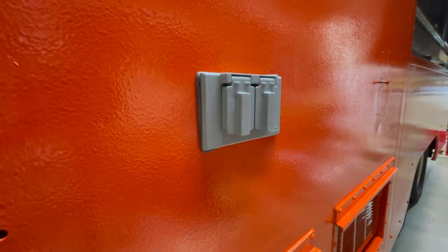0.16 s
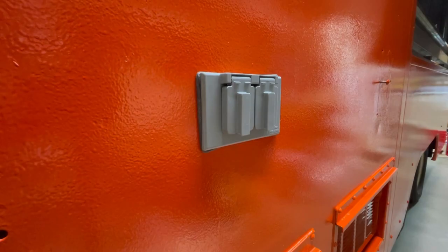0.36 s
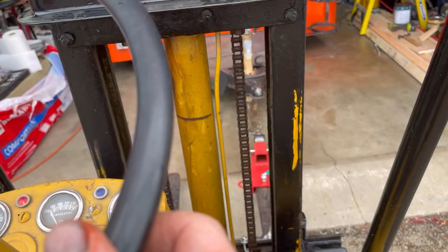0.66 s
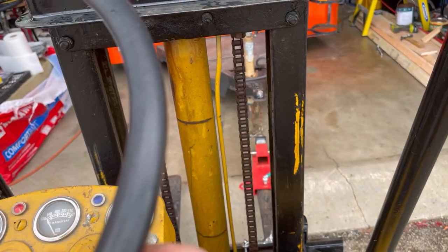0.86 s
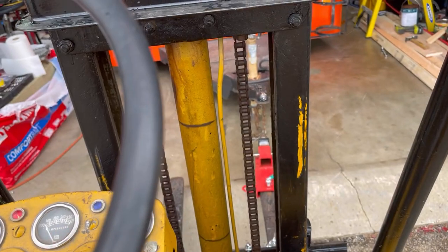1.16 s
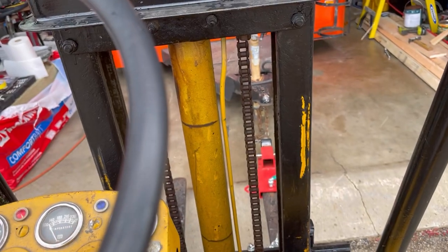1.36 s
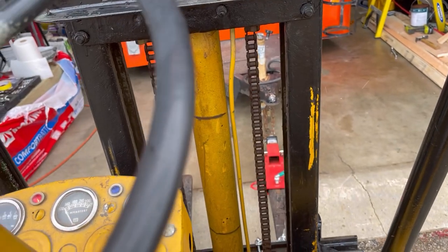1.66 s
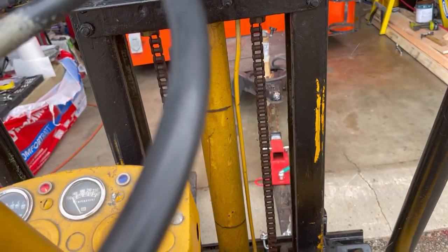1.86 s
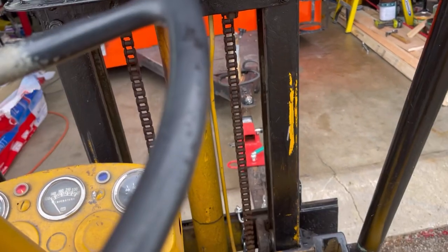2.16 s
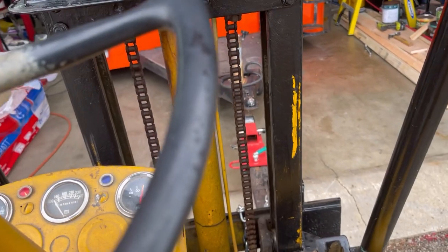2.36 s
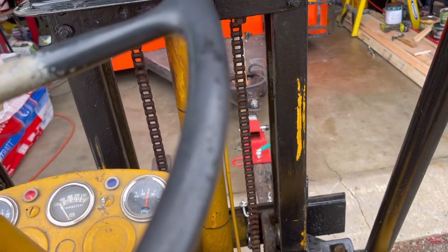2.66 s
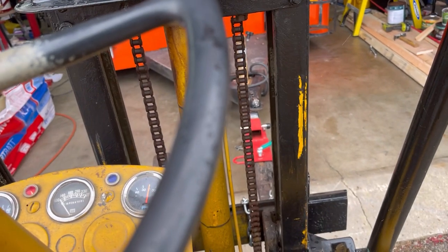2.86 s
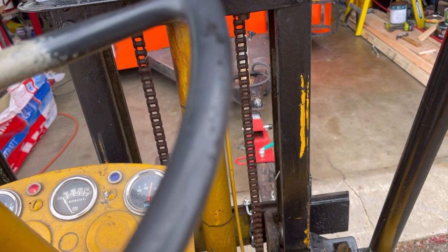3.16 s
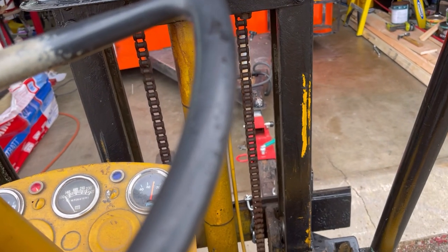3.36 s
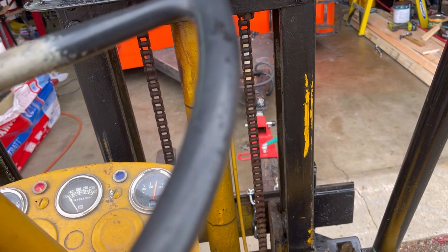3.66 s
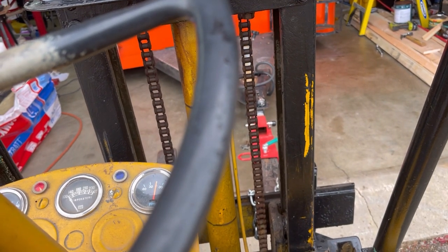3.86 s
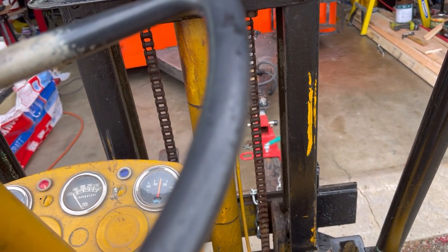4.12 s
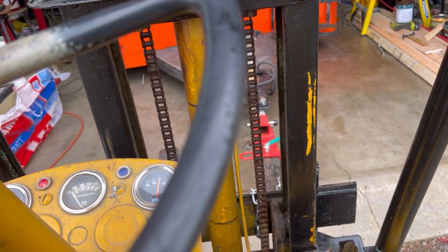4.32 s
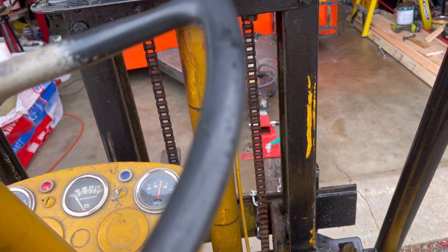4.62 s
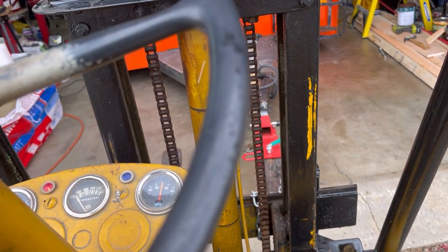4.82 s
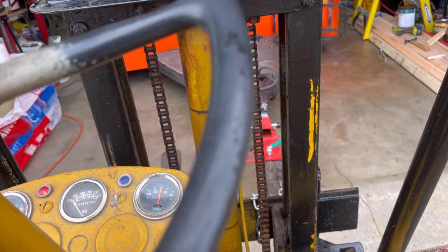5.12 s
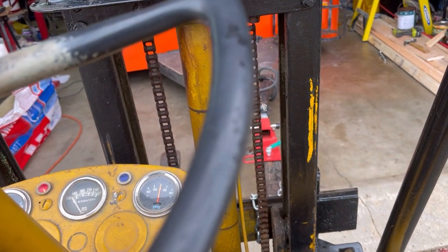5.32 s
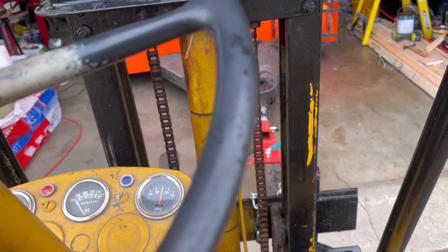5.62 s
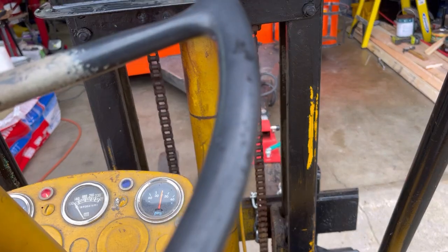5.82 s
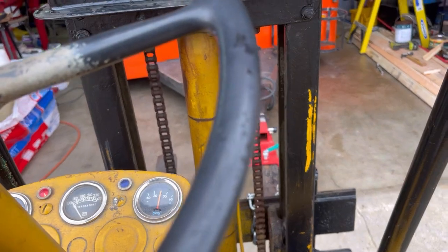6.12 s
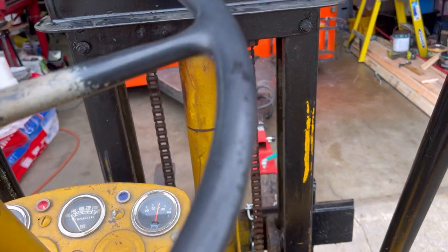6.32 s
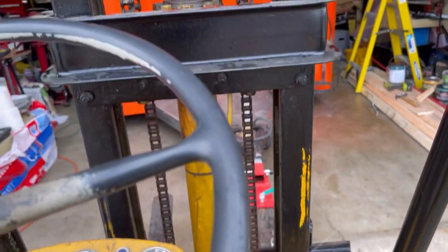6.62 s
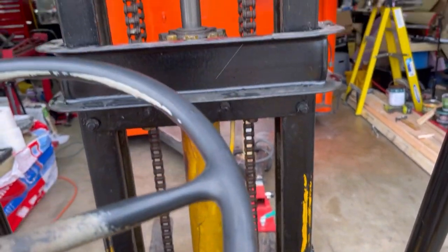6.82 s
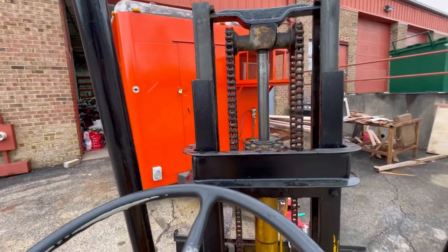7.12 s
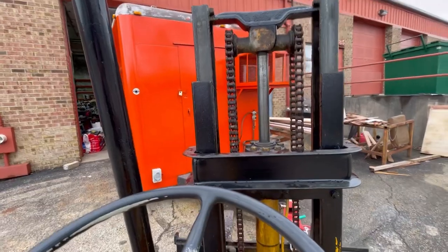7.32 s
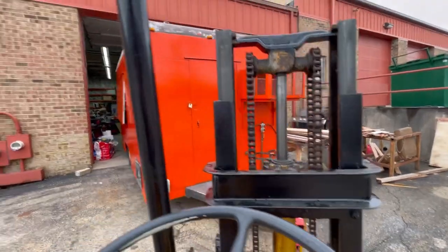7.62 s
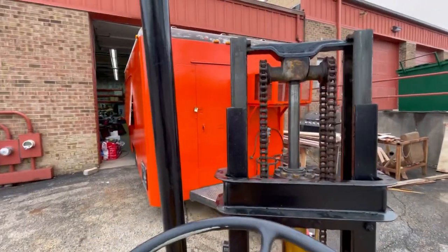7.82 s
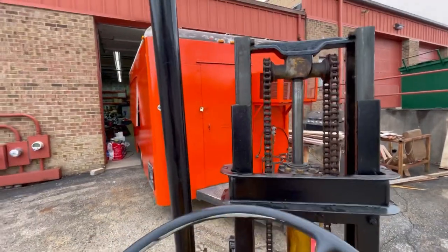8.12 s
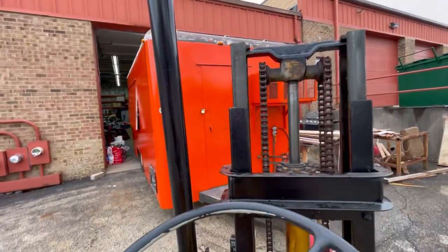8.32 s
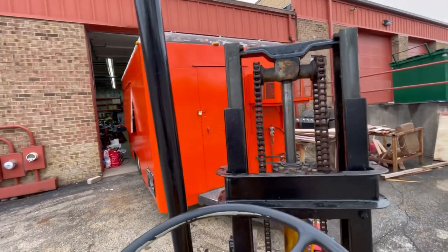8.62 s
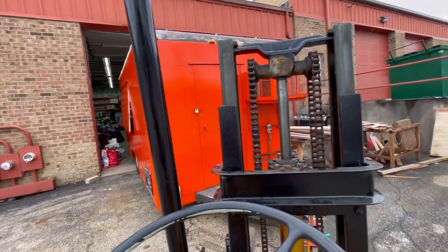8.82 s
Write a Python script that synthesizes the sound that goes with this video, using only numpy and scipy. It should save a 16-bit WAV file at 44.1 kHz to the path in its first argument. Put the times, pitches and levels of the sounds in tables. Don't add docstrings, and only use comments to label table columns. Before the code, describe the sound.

Heard from the driver's seat in stereo: a quiet indoor hush gives way suddenly to a lumpy diesel idle with buzzing panels and bright rattling castings. Low thumps of handling dot the first second. Revs rise midway, followed by a hard double lever clank that briefly dips the sound. The scene jumps outdoors, the engine slows with light chain shivers, then climbs quickly to a louder, faster roar.

```python
import sys
import numpy as np
from scipy import signal
from scipy.fft import rfft, irfft, next_fast_len
from scipy.io import wavfile
from scipy.ndimage import uniform_filter1d, map_coordinates

SR = 44100
rng = np.random.default_rng(int(sys.argv[2]) if len(sys.argv) > 2 else 0)


def volts_from_decibels(level):
    exponent = np.asarray(level, float) / 20
    return 10 ** exponent


def waveform_to_disk(signal):
    frames = np.transpose(np.atleast_2d(signal))
    scaled = np.clip(frames, -1, 1) * 32767
    samples = np.round(scaled).astype(np.int16)
    wavfile.write(sys.argv[1], SR, samples)


N = 396018
TIME = np.arange(N) / SR

# [t/s, crank position/firings]
CUTS = [
    (0.561, 0.0),
    (1.959, 0.672),
    (6.892, 1.468),
]

# [f/Hz, level/dB per Hz]
SHOP_AIR = [(18, -38), (30, -22), (64, -1.5), (107, -13), (190, -12.5), (330, -19), (586, -22), (950, -17),
            (1050, -19.5), (2200, -25), (5620, -33.5), (8800, -39), (9900, -56), (11200, -54), (12500, -50),
            (14200, -51), (15000, -70)]
# [f/Hz, likeness -1 to 1]
SHOP_ALIKE = [(60, 0.98), (230, 0.67), (880, -0.45), (3360, 0.085), (12800, -0.2)]
SHOP_DB = -47.5
# [f/Hz, level/dB]
HUM = [(59.2, -55), (269.2, -68), (845.2, -76), (958.2, -73)]

# [t/s, peak level/dB, f/Hz]
BUMPS = [(.643, -45.5, 216), (0.653, -23.5, 273), (0.699, -18, 156), (0.821, -28, 150), (.891, -19, 205),
         (.909, -31, 150), (1.035, -22, 280), (1.146, -29.5, 240), (1.192, -28, 200), (1.958, -27, 150),
         (6.893, -38, 35)]
# [t/s, peak level/dB]
TICKS = [
    (1.9595, -34),
    (6.8945, -42),
]

# [t/s, peak level/dB, t60/s, brightness 0-1]
CLANKS = [
    (5.7015, -31, .05, 0),
    (5.7055, -24.5, .07, 1),
    (5.8640, -21, .05, .15),
    (5.8765, -23, .1, 0),
    (5.888, -27, .1, 0),
    (5.909, -29, .16, 0),
]
# [f/Hz, t60/s, heavy-blow level/dB, thin-blow level/dB]
LEVER_MODES = [(1160, 0.036, -15, -18), (1770, 0.078, -5.5, -10), (2220, 0.04, 1.5, -12),
               (2430, 0.066, -5.5, -9), (2714, 0.083, -4, -7), (3050, 0.038, -8, -2),
               (3640, 0.044, -12, -2), (4470, 0.054, -17, -11), (5530, 0.046, -19, -7),
               (5900, .04, -25, -9)]
# [f/Hz, level/dB per Hz]
THIN_STEEL = [(300, -40), (900, -1), (2000, -9), (3000, -2), (4000, -8), (5700, -4), (7000, -16),
              (11500, -13), (13300, -45)]
# [f/Hz, level/dB per Hz]
HEAVY_STEEL = [(250, -8.5), (830, -3), (1300, -8), (2300, -4), (2800, -6), (3600, -14.5), (5200, -19),
               (11500, -23), (13300, -45)]

# [t/s, peak level/dB]
JINGLES = [(7.3118, -41), (7.416, -44), (7.6969, -40), (7.7323, -38), (7.9733, -48), (8.0531, -45),
           (8.092, -36), (8.1319, -40), (8.3594, -39)]
# [f/Hz, level/dB per Hz]
CHAIN_LINKS = [(2500, -27), (5500, -2), (7000, -9), (8800, 4), (10400, 4), (12300, -9), (13300, -19),
               (16000, -40)]
JINGLE_T60_S, JINGLE_DB = 0.059, -5

# [f/Hz, likeness -1 to 1]
ALIKE_SHED = [(60, 0.8), (130, 0.98), (280, 0.95), (450, 0.95), (700, 0.18), (1290, 0.46), (4500, 0.42),
              (9000, 0.4), (11500, 0.4)]
# [f/Hz, likeness -1 to 1]
ALIKE_YARD = [(60, 0.2), (130, 0.48), (280, 0.92), (600, 0.2), (1290, 0.11), (2770, -0.16), (6000, .1),
              (9000, .4), (12000, 0.37)]

# [t/s, firing rate/(1/s)]
SPEED = [(0.561, 22.883), (1.803, 21.717), (1.958, 22.469), (1.959, 22.647), (4.5, 22.29), (5.151, 26.903),
         (5.437, 28.344), (5.907, 28.511), (6.607, 30.896), (6.891, 31.241), (6.892, 29.552),
         (7.072, 30.982), (7.596, 26.915), (8.151, 25.645), (8.283, 26.138), (8.438, 29.339),
         (8.794, 40.924), (8.979, 41.99)]
HUNT_HZ, HUNT_S, HUNT_FROM_S, HUNT_TO_S = .325, 1.035, 1.761, 4.55
# [t/s, level over idle/dB]
LOAD = [(.56, -1), (4.3, -1), (4.6, 0.5), (5.2, 0), (5.82, 0), (6.05, -3), (6.89, -3), (6.893, -1),
        (7.2, -4.5), (7.8, -4), (8.2, -2.5), (8.35, -1.5), (8.45, 1.5), (8.6, 3), (8.8, 3), (8.98, 2)]
# [level at idle/dB, growth/(dB per dB of load), change in the yard/dB]
LAYERS = [
    (-33.5, 0.7, -1),
    (-44.5, 1.36, 2.5),
    (-46, 1.55, 0),
    (-1, 0.5, -2.5),
]

STROKE_DB = [-4, -4.5, -4, -3, -9, -9, -20.5, -15, -17.5, -20.5, -17]
# [multiple, level/dB]
HALVES = [(1.5, -34), (2.5, -22), (3.5, -35), (4.5, -29), (8.5, -26.5)]
HALVES_YARD_DB = 6
# [f/Hz, level in the doorway/dB, level in the yard/dB]
PIPE = [(44.3, -37, -50), (55.4, -24.5, -21.5), (71.6, -25.5, -25.5), (87.5, -35, -33.5),
        (103.5, -34.5, -33.5), (156, -42, -48), (197.2, -41, -49), (215.3, -30, -41.5), (226, -41.5, -42),
        (253, -47, -42), (332, -44.5, -42), (520, -50, -43)]
# [f/Hz, lag/cycles]
PIPE_LAG = [(45, -.15), (62, .38), (68, .65), (84, .8), (92, 1.0), (112, 1.3), (135, 1.35), (160, 1.28),
            (182, 1.17), (203, 1.45), (250, 1.6)]
ROAR_FROM, ROAR_DB, ROAR_DULLS = 30.7, 0.89, 0.098

# [f/Hz, t60/s, delay/s, level for cylinders 1-4/dB (4 columns),
# change when coasting in the yard/dB]
PANELS = [(167.4, 0.075, .004, -7.5, -2.5, 0, 0, 2.5), (204.5, 0.1, .006, -2, -3.5, -3, -5.5, 0.4),
          (255, 0.07, .006, 0.5, 0.5, -0.5, 1, -2), (311, 0.045, .004, -12, -10, -5.5, -9.5, -1.5),
          (413.9, 0.12, -.002, 4, -.5, -1.5, -4, -5), (443.4, 0.071, 0, 1, -13, -9, -1.5, -16),
          (504, 0.051, -0.0064, -2, -6.5, -10.5, -14, -9), (573, 0.23, -.003, -10, -21, -42, -41, -12),
          (592, 0.22, -.003, -19, -33, -36, -54, 17), (723, 0.033, -0.0043, -15, -17, -23, -20.5, 14)]
OPEN_DB = [0.1, 1.5, -1.5, 7, -4.5, -4, -2, 3, -6, 4.5]
# [t/s, level/dB]
JOLTS = [(.911, 1.5), (1.09, 0), (1.27, 2), (1.45, 1), (1.814, -0.5), (4.765, -4), (4.94, 0), (6.99, -1),
         (7.12, -1.5), (7.256, -1), (7.38, -7.5), (7.52, -2), (7.68, 3.5), (7.83, -1), (7.98, 3.5),
         (8.13, 2.5), (8.29, -3)]
EVENED, LOWEST_DB, LOW_PANELS_DB, UPPER_PANELS_DB, TOP_PANEL_DB = 0.4, -2, 8, 2, 10
FIRST_UPPER_DB = 3
SPOOL_DB = -5
FLOOR_STIFFENS_HZ = 9
KNOCK_SAGS_DB, KNOCK_SAGS_UNDER = 1.5, 28.2
# [f/Hz, level/dB per Hz]
RUMBLE = [(25, -42), (45, -29), (80, -4.5), (130, -7), (214, -11.5), (334, -15.5), (414, -9.5), (509, -22),
          (800, -26), (1040, -30), (1760, -120)]

# [f in the first, second and third view/Hz (3 columns), width/Hz, level/dB,
# change in the yard/dB]
BLOCK = [(840, 888, 876, 41, -14.5, 7), (1307, 1275, 1310, 59, -9, 3.5), (1648, 1700, 1775, 45, -1, -0.5),
         (1956, 1890, 1900, 50, -9, 0), (2280, 2300, 2350, 110, -9, 3), (2470, 2530, 2530, 29, -5, 3),
         (2800, 2670, 2900, 25, -17, 14), (3350, 3160, 3330, 67, -3, 2), (3610, 3670, 3530, 35, -12.5, 4),
         (3834, 3880, 3880, 34, -2, 7), (4210, 4100, 4290, 66, 3, 1), (4370, 4440, 4800, 77, 5, -2),
         (4560, 4650, 4660, 70, -2, -1), (5260, 5390, 5350, 40, -1, 3.5), (5610, 5760, 6500, 90, -1, 1),
         (6140, 6100, 5600, 100, -11, 15), (8040, 8060, 7890, 68, -3, -8), (8320, 8510, 8380, 98, -3, 4),
         (8600, 8830, 10000, 86, -4, 9), (8980, 9080, 9250, 84, -6, 1),
         (10700, 11300, 11500, 106, -21.5, -6)]
# [f/Hz, level/dB per Hz]
RATTLE = [(350, 0), (600, -2), (1040, -4.5), (1280, -7.5), (1530, -9.5), (1700, -9), (2600, -14),
          (3640, -32), (6160, -120)]
# [f/Hz, level/dB per Hz]
CLATTER = [(1350, -12.5), (2300, -15), (2820, -2.5), (3220, -1), (3500, 0), (4520, -6), (4900, 0.5),
           (5890, -1.5), (6870, -8.5), (8750, -6.5), (10200, -2.5), (11400, -7.5), (12200, -14.5),
           (13000, -27), (14500, -45)]
# [t/s, level/dB]
HARD = [(.911, 1), (1.09, 1.5), (1.45, -0.5), (1.633, -1), (1.814, 1.5), (3.303, 0.5), (4.598, 1.5),
        (4.93, 0.1), (4.969, 0.4), (5.084, 0.5), (7.521, 2), (7.67, -2), (8.091, 2.5), (8.284, 2),
        (8.43, 1.5), (8.498, 2.5)]
VALVE_LEAD_S, DAMPED_AT = .003, .92
STAGGER_S = .0014
YARD_RING_DB, YARD_BED_DB = -3, .5

# [f/Hz, first level/dB, second level/dB, third level/dB]
FACING = [(300, 0.5, 0.5, 0), (780, -0.5, -0.5, -.5), (1090, -3.5, -1, 2), (1480, 1, 0, 1.5),
          (2580, 0.5, -1, 0), (5900, -1.5, -1.5, -1), (9900, -0.5, -0.5, -1.5), (12600, -1.5, -0.5, 2.5)]
TURN_S, TURN_HZ = .0003, 500

# [t/s, level/dB]
DUCK = [
    (5.87, 3.5),
    (5.92, -6),
    (6.0, -2),
    (6.15, 3),
]
# [f/Hz, left minus right level/dB]
LEAN = [(60, 0.0), (110, 0.0), (200, 0.5), (360, 0.5), (650, -1.5), (1180, -1.0), (2150, -0.5),
        (3900, -2.5), (7080, -1.5), (12800, 0.0)]
# [f/Hz, width/Hz, level/dB]
SIDE_DIPS = [(6650, 400, -11), (8650, 400, -18)]
STARVED_DB, STARVED_SWAY_DB = -14.5, 3


def unit(x):
    return x / np.sqrt(np.mean(x ** 2) + 1e-20)


def along(points, hz):
    f, v = np.transpose(points)
    return np.interp(np.log(hz + 1), np.log(f + 1), v)


def curves(rows):
    s, *cols = np.transpose(rows)
    return [np.interp(TIME, s, c) for c in cols]


def wobble(rate):
    return map_coordinates(rng.standard_normal(int(N * rate / SR) + 4), [TIME * rate])


def coloured(x, points):
    m = next_fast_len(N + 8192)
    response = volts_from_decibels(along(points, np.fft.rfftfreq(m, 1 / SR)))
    return unit(irfft(rfft(x, m) * response, m)[..., :N])


def spread(pair, alike):
    likeness = np.clip(along(alike, np.fft.rfftfreq(N, 1 / SR)), -1, 1)
    turn = np.arccos(likeness) / 2
    mid, side = irfft(rfft(pair) * [np.cos(turn), np.sin(turn)], N)
    return np.array([mid + side, mid - side])


def laid(times, rows):
    at = np.round(np.asarray(times) * SR).astype(int)[:, None] + np.arange(rows.shape[-1])
    return np.bincount(at.ravel(), rows.ravel(), N + SR)[:N]


def workshop():
    air = coloured(rng.standard_normal((2, N)), SHOP_AIR)
    hush = volts_from_decibels(SHOP_DB - 3.5 + 0.78 * wobble(9.4)) * spread(air, SHOP_ALIKE)
    hum = sum(volts_from_decibels(db + 3.0 + 1.5 * wobble(4.8)) * np.sin(2 * np.pi * hz * TIME) for hz, db in HUM)
    return (hush + hum) * volts_from_decibels([[1.1], [-1.1]]) * (TIME < CUTS[0][0])


def handling():
    s, db, hz = np.transpose(BUMPS)[:, :, None]
    cycles = hz * np.arange(SR // 10) / SR
    pushes = laid(s[:, 0], volts_from_decibels(db + 5.5) * np.sin(2 * np.pi * cycles) * np.exp(-1.6 * cycles))
    s, db = np.transpose(TICKS)[:, :, None]
    return pushes + laid(s[:, 0], volts_from_decibels(db) * [1, -1])


def chain():
    s, db = np.transpose(JINGLES)[:, :, None]
    t = np.arange(SR // 10) / SR
    decay = volts_from_decibels(db + JINGLE_DB - 60 * t / JINGLE_T60_S)
    shape = laid(s[:, 0] - .002, decay * (1 - np.exp(-t / .002)))
    links = coloured(rng.standard_normal((2, N)), CHAIN_LINKS)
    return shape * volts_from_decibels(3 * wobble(300)) * spread(links, ALIKE_YARD)


def lever():
    s, db, t60, bright = np.transpose(CLANKS)[:, :, None]
    t = np.arange(SR // 4) / SR
    blows = volts_from_decibels(db - 8.5 - 60 * t / t60) * (1 - np.exp(-t / .002))
    share = np.clip(bright, 0, 1)
    thin = laid(s[:, 0], share * blows) * coloured(rng.standard_normal((2, N)), THIN_STEEL)
    heavy = laid(s[:, 0], (1 - share) * blows) * coloured(rng.standard_normal((2, N)), HEAVY_STEEL)
    ring = np.zeros((2, len(s), len(t)))
    for hz, ring_t60, heavy_db, thin_db in LEVER_MODES:
        draw = rng.standard_normal((3, len(s), 1))
        mode_db = heavy_db + share * (thin_db - heavy_db) + 3.0 * draw[0]
        level = volts_from_decibels(db - 11.0 + mode_db - 60 * t / ring_t60)
        ring += level * (1 - np.exp(-t / 0.00092)) * np.sin(2 * np.pi * hz * t + 3 * draw[1:])
    rung = np.array([laid(s[:, 0], r) for r in ring])
    return 2 * volts_from_decibels(1.0 * wobble(150)) * spread(thin + heavy + rung, ALIKE_SHED)


def crank():
    rate, = curves(SPEED)
    hunting = (TIME > CUTS[1][0]) & (TIME < HUNT_TO_S)
    rate = rate + hunting * HUNT_HZ * np.sin(2 * np.pi * (TIME - HUNT_FROM_S) / HUNT_S)
    done = np.cumsum(rate) / SR
    position = np.zeros(N)
    for s, start in CUTS:
        first = int(s * SR)
        position[first:] = start + done[first:] - done[first]
    return rate, position


def clatter(times, cylinder, spectrum, rise, t60, ring_db, bed_db, cylinder_db):
    t = np.arange(3072) / SR
    hz = np.fft.rfftfreq(3072, 1 / SR)
    view = np.searchsorted([s for s, _ in CUTS[1:]], times)[:, None]
    yard = view == 2
    gap = np.interp(times, TIME, 1 / curves(SPEED)[0])[:, None]
    shape = (1 - np.exp(-(t / rise) ** 2)) * volts_from_decibels(-60 * t / t60)
    shape = shape * np.exp(-(t / (DAMPED_AT * gap)) ** 4)
    burst, echo = rfft(rng.standard_normal((2, len(times), 3072)) * shape)
    hard_db = sum(db * (np.abs(times - s) < .012) for s, db in HARD)
    size = volts_from_decibels(np.array(cylinder_db)[cylinder] + hard_db + .8 * rng.standard_normal(len(times)))[:, None]
    colour = np.ones((2, *burst.shape), complex)
    for *centre_hz, width, db, yard_db in BLOCK:
        draw = np.clip(rng.standard_normal((len(times), 3, 1)), -2, 1.7) * [[4.0], [.009], [.9]]
        fc = np.array(centre_hz)[view] * (1 + draw[:, 1])
        level = volts_from_decibels(ring_db + YARD_RING_DB * yard + (db + yard_db * yard) / 2 + draw[:, 0])
        mode = level * 1j * hz * width / (fc ** 2 - hz ** 2 + 1j * hz * width)
        late = STAGGER_S * rng.exponential(1, (len(times), 1)).clip(0, 4)
        mode *= np.exp(-2j * np.pi * hz * late)
        colour += [mode, mode * np.exp(1j * draw[:, 2])]
    across = np.where(yard, echo, -1j * burst)
    rung = irfft(colour * [burst, across], 3072) * size
    starts = times - VALVE_LEAD_S * (times > times[0])
    shaken = unit(np.array([laid(starts, r) for r in rung]))
    bed = volts_from_decibels(bed_db + YARD_BED_DB * (TIME > CUTS[2][0])) * rng.standard_normal((2, N))
    return coloured(shaken + bed, spectrum)


def knock(times, cylinder):
    t = np.arange(SR // 8) / SR - 1 / 200
    rows = np.zeros((2, len(times), len(t)))
    in_yard = times > CUTS[2][0]
    coasting = in_yard * np.interp(times, [8.3, 8.5], [1, .5])
    opened = np.interp(times, [8.2, 8.45], [0, 1])
    revved = (times < CUTS[2][0]) * np.interp(times, [4.7, 5.1], [0, 1])
    spooling = np.interp(times, [4.45, 4.6, 4.95, 5.1], [0, 1, 1, 0])
    jolt_db = sum(db * (np.abs(times - s) < .018) for s, db in JOLTS)
    for (hz, t60, delay, *db), open_db in zip(PANELS, OPEN_DB):
        draw = rng.standard_normal((len(times), 4)) * [1.2, .0002, .006, 1]
        upper = 480 < hz < 650
        revved_db = EVENED * np.mean(db[:4]) + LOWEST_DB * (hz < 230) + LOW_PANELS_DB * (280 < hz < 350)
        revved_db += UPPER_PANELS_DB * upper + TOP_PANEL_DB * (hz > 650)
        level_db = np.array(db)[cylinder] * (1 - EVENED * revved) + revved * revved_db
        level_db = level_db + db[4] * coasting + open_db * opened
        level_db = level_db + FIRST_UPPER_DB * (times < 1.5) * upper
        level_db = level_db + jolt_db * (hz > 400) + SPOOL_DB * spooling * (hz < 300)
        level = volts_from_decibels(level_db + draw[:, 0])[:, None]
        age = np.clip(t - delay - draw[:, 1:2], 0, None)
        shape = level * volts_from_decibels(-60 * age / t60) * (1 - np.exp(-age / 0.0019))
        stiff_hz = FLOOR_STIFFENS_HZ * (190 < hz < 230) * np.maximum(revved, in_yard)[:, None]
        cycles = (hz + stiff_hz) * (1 + draw[:, 2:3]) * age + (hz < 300) * draw[:, 3:] / 11
        rows += shape * np.sin(2 * np.pi * np.array([cycles, cycles + draw[::-1, 3:]]))
    return unit(np.array([laid(times - 1 / 200, r) for r in rows]))


def tones(rate, position, level_db):
    yard = TIME > CUTS[2][0]
    uneven = 0.052 * np.cos(np.pi * position) + 0.011 * np.cos(np.pi / 2 * position)
    level_db = level_db + ROAR_DB * np.clip(rate - ROAR_FROM, 0, None)
    in_door, in_yard = np.array(PIPE)[:, :2], np.array(PIPE)[:, ::2]
    halves = [(k, db + HALVES_YARD_DB * yard) for k, db in HALVES]
    total = np.zeros(N)
    for k, db in [*enumerate(STROKE_DB, start=2), *halves]:
        hz = k * rate
        pipe_db = np.where(TIME < CUTS[2][0], along(in_door, hz), along(in_yard, hz))
        sway_db = (0.57 + 0.15 * k) * wobble(19) + 0.41 * (k - 2.5) * wobble(4.2)
        level = volts_from_decibels(level_db * (1 - ROAR_DULLS * (k - 0.5)) + db + pipe_db + sway_db)
        wave = np.cos(2 * np.pi * (k * position - along(PIPE_LAG, hz)))
        total += level * np.sqrt(2) * (1 + k * uneven / 2) * wave
    return total


def engine():
    rate, position = crank()
    fired = np.flatnonzero((np.diff(np.floor(position)) % 4 == 1) & (TIME[1:] > CUTS[0][0]))
    times = np.append(CUTS[0][0], fired / SR)
    cylinder = np.append(0, position[fired + 1].astype(int) % 4)
    yard = TIME > CUTS[2][0]
    load_db, = curves(LOAD)
    knock_db, rattle_db, clatter_db, tone_db = (db + grows * load_db + yard_db * yard
                                                for db, grows, yard_db in LAYERS)
    knock_db -= KNOCK_SAGS_DB * np.clip(KNOCK_SAGS_UNDER - rate, 0, None) * yard
    rumble = coloured(rng.standard_normal((2, N)), RUMBLE) * volts_from_decibels(-11.5 + 1.5 * wobble(9))
    body = volts_from_decibels(knock_db) * (volts_from_decibels(-4.0) * knock(times, cylinder) + rumble)
    body += volts_from_decibels(rattle_db) * clatter(times, cylinder, RATTLE, rise=.006, t60=.4, ring_db=11.5, bed_db=-6.5,
                                     cylinder_db=[1.5, 0, -.5, -1])
    body += volts_from_decibels(clatter_db) * clatter(times, cylinder, CLATTER, rise=.004, t60=.26, ring_db=12.5, bed_db=-9,
                                      cylinder_db=[1.6, .3, -.3, -1.2])
    hz = np.fft.rfftfreq(N, 1 / SR)
    facing = np.array(FACING)
    first, second, third = (irfft(rfft(body) * volts_from_decibels(along(facing[:, [0, k]], hz)), N) for k in range(1, 4))
    shed = spread(np.where(TIME < CUTS[1][0], first, second), ALIKE_SHED)
    tone = tones(rate, position, tone_db)
    left, right = spread(third, ALIKE_YARD) + tone
    lag = volts_from_decibels(.3) * np.exp(1j * np.pi * hz * TURN_S * np.exp(-(hz / TURN_HZ) ** 2))
    turned = irfft(rfft([left, right]) * [lag, 1 / lag], N)
    return np.where(TIME < CUTS[2][0], shed + tone, turned) * (TIME > CUTS[0][0])


def scene():
    return workshop() + handling() + chain() + lever() + engine()


def starved(pair):
    hz, _, z = signal.stft(pair, SR, nperseg=2048)
    power = np.abs(z[:, :1024].reshape(2, 64, 16, -1)) ** 2
    level = 10 * np.log10(power.mean(axis=2) + 1e-20)
    sway = uniform_filter1d(rng.standard_normal(level.shape), size=4, axis=2)
    sway = unit(uniform_filter1d(sway, size=2, axis=1))
    neighbours = level[:1, 23:27].mean(axis=1, keepdims=True)
    weak = level < neighbours + STARVED_DB + STARVED_SWAY_DB * sway
    z[:, :1024] *= ~(np.repeat(weak, 16, axis=1) & (hz[:1024, None] > 6000))
    return signal.istft(z, SR, nperseg=2048)[1][:, :N]


def top_cut(x):
    return signal.sosfilt(signal.butter(12, 16000, fs=SR, output="sos"), x)


def record(dry):
    m = next_fast_len(N + 8192)
    hz = np.fft.rfftfreq(m, 1 / SR)
    lean = volts_from_decibels(along(LEAN, hz) / 2)
    ducked = dry * volts_from_decibels(curves(DUCK)[0])
    rounded = ducked / (1 + np.abs(ducked / .2) ** 4) ** (1 / 4)
    left, right = rfft(rounded, m) * [lean, 1 / lean]
    notch = volts_from_decibels(-18 * np.exp(-((hz - 10400) / 560) ** 4))
    dips_db = sum(db * np.exp(-((hz - c) / w) ** 2) for c, w, db in SIDE_DIPS)
    narrows = volts_from_decibels(dips_db + np.interp(hz, [7000, 9000, 10600, 11200, 12400], [0, 3, 1.5, -1.5, -9]))
    middle_side = irfft([(left + right) * notch, (left - right) * narrows], m)[:, :N] / 2
    mid, side = starved(middle_side)
    mix = np.array([mid + side, mid - side])
    return top_cut(mix)


dry = scene()
out = record(dry)
waveform_to_disk(out)
```